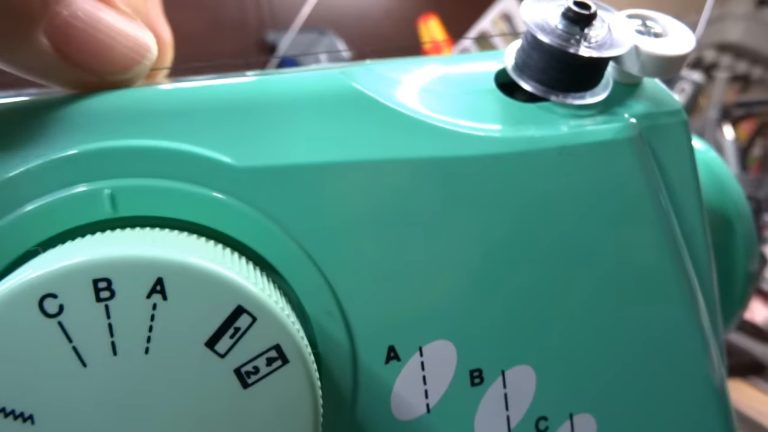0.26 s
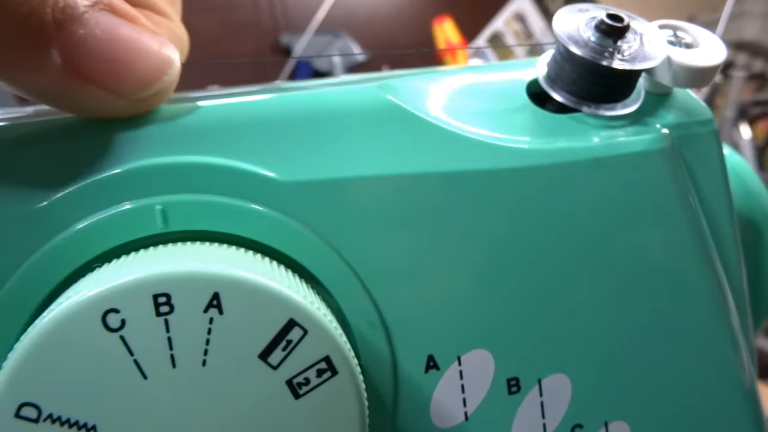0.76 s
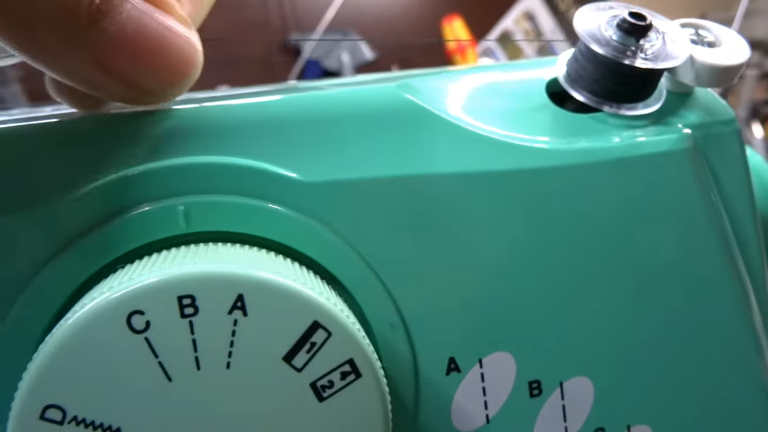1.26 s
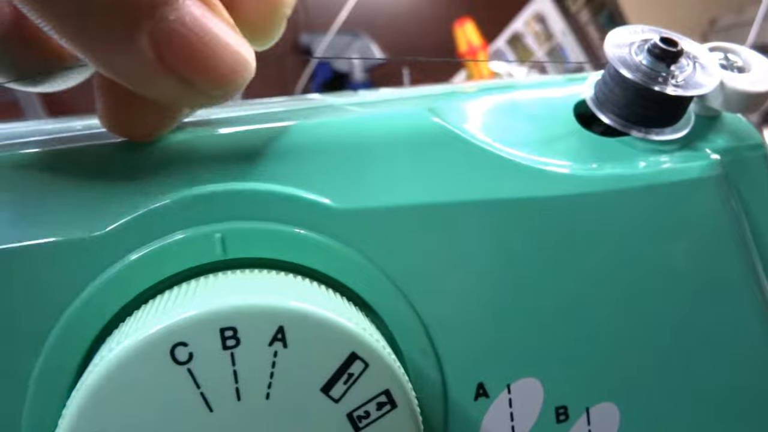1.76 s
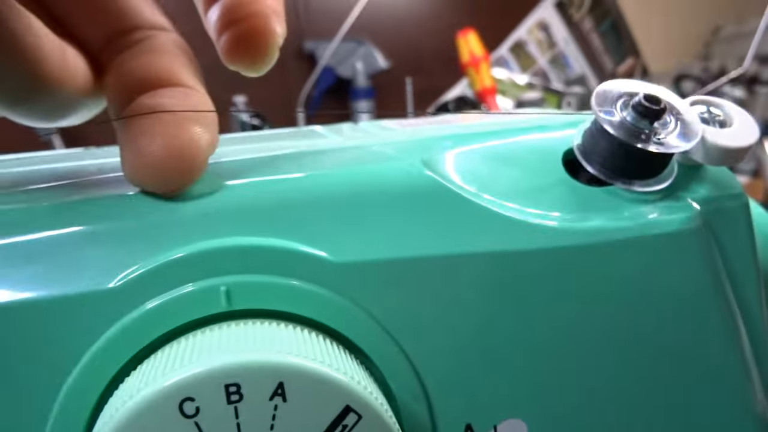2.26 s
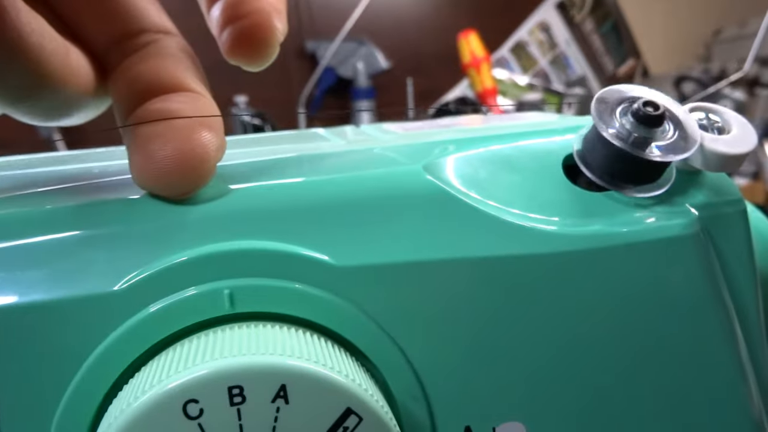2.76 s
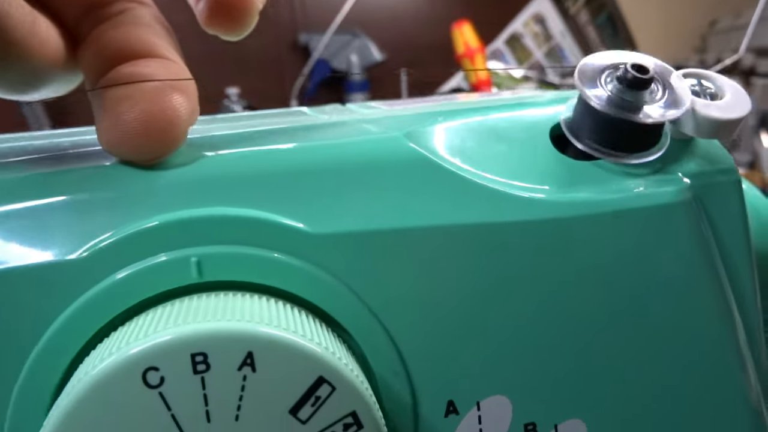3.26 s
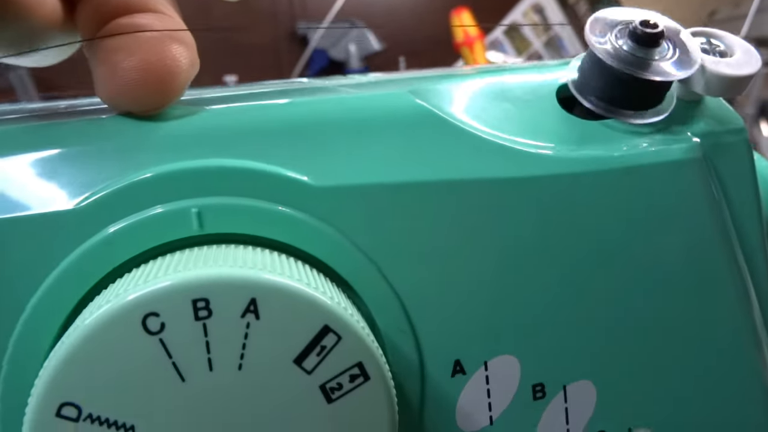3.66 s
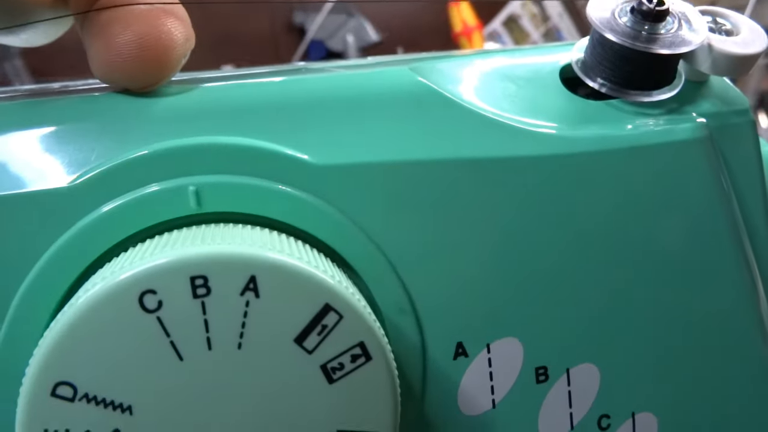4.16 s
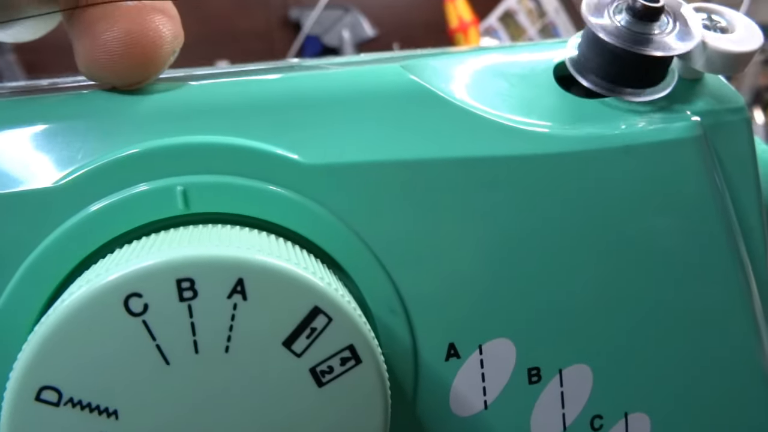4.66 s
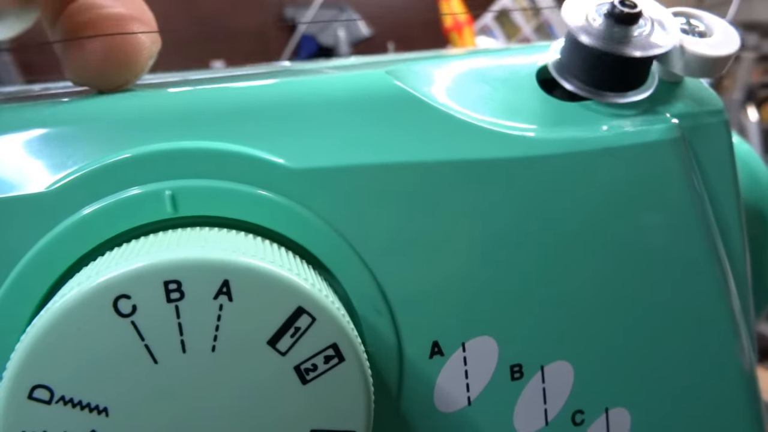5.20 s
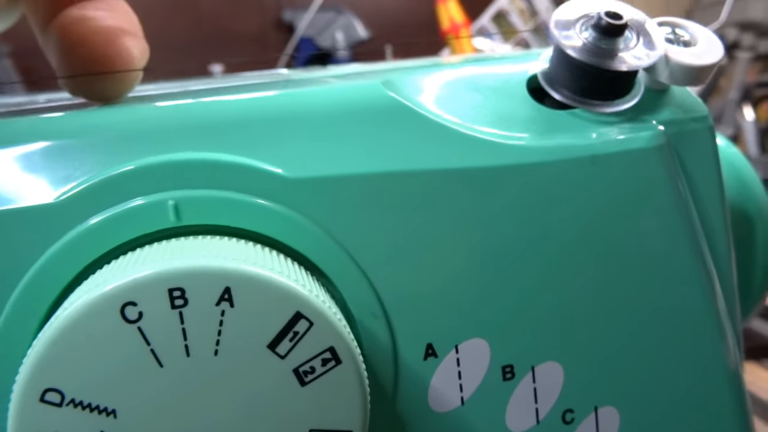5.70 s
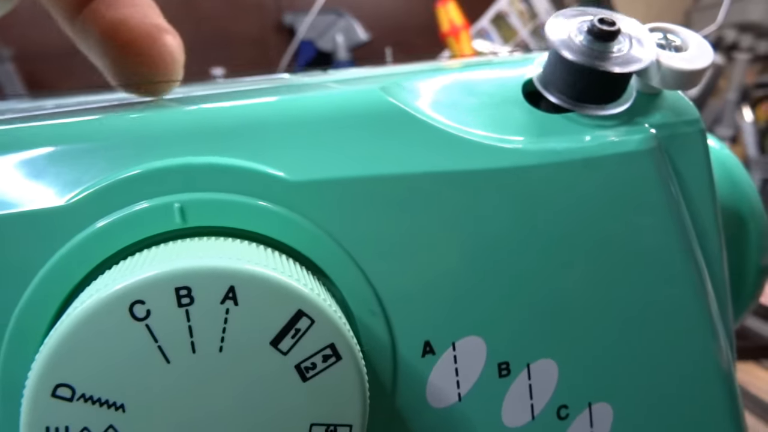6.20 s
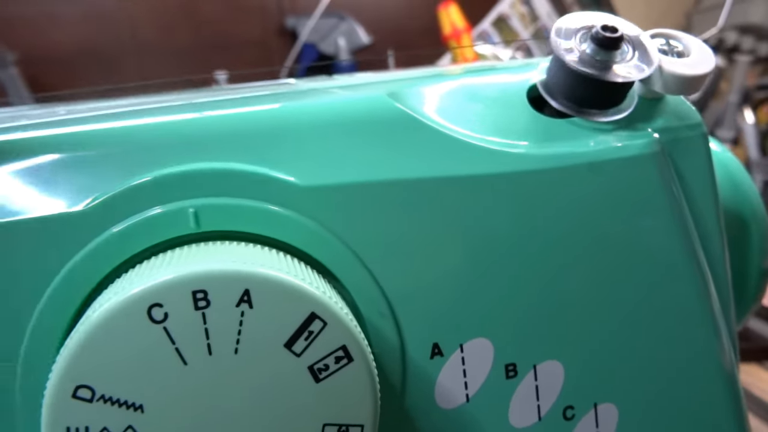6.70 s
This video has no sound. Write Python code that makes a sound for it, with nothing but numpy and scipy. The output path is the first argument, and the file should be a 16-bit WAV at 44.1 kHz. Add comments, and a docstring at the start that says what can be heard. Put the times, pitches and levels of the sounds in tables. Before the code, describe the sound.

After faint handling sounds, a small electric sewing machine motor revs briefly, coasts down, then whirs up again and keeps winding a rattling bobbin.

```python
"""Soft rubs and taps of fingers come first, in a quiet room; then a small sewing machine winds a bobbin.
It is driven twice: it whirs up, coasts down, whirs up again and runs to the end.
Gear grit, a knock per turn and the motor's commutator tone shake the hollow plastic housing, made of
resonators. Filtered noise makes the brush hiss; dying bursts of noise ring the loose metal bobbin.
Sines make the motor's other tones and its hum; a soft noise of air lies below everything."""
import sys
import numpy as np
from scipy import signal
from scipy.fft import rfft, irfft, next_fast_len
from scipy.io import wavfile

SR = 44100
rng = np.random.default_rng(int(sys.argv[2]) if len(sys.argv) > 2 else 0)


def dump_mix(stems):
    """Bounce the given channels to the path in sys.argv[1] as a 16-bit WAV at rate SR."""
    frames = np.atleast_2d(stems).T  # one column per channel
    limited = np.clip(frames, -1, 1)  # hard clip at full scale
    pcm = np.round(limited * 32767).astype(np.int16)
    wavfile.write(sys.argv[1], SR, pcm)


N = 306054

# Runs of the drive: (on t/s, off t/s, spin-up time/s)
PEDAL_RUNS = [(2.29, 3.475, .106), (4.32, 7.5, .051)]
REFERENCE_SPEED = 60  # turns/s
JERK_SPEED, JERK_S = 8.5, 0.03  # the rotor breaks loose with a jerk: turns/s won, time/s
QUICK_SPEED = 35.5  # turns/s won in the spin-up
SLOW_SPEED, SLOW_RISE_S = 16.5, 0.6  # turns/s won slowly, time/s
DRAG_S, FRICTION = 0.8, 42  # coasting: air and belt drag/s, dry friction/(turns/s lost per s)
SWITCH_ON_S, SWITCH_OFF_S = 0.015, 0.19  # the drive takes up and lets go of the load

# How layers follow the speed: (level/dB at reference speed, gain per doubling/dB, loss without current/dB)
LOW_LAW = (-29.5, 6.14, 1.8)
MIDDLE_LAW = (-23.5, 12.1, 3.4)
HIGH_LAW = (-23.5, 13.3, 2)
HISS_LAW = (-37.5, 12, 1.2)
HUM_LAW = (3.1, 7.6, 50)
# Brief level changes of the whir: (t/s, length/s, change of middle panels/dB, change of high panels/dB)
SWELLS = [(2.522, 0.018, 1.5, -5), (2.598, 0.018, -8, 1), (2.738, 0.095, 3.5, 2.5), (3.09, 0.077, 4.5, 0),
          (3.45, 0.019, 5, 2), (3.582, 0.079, 7, -1), (4.726, 0.18, -0.5, -1), (4.735, 0.064, 4.5, 5),
          (4.801, 0.02, 8.5, -1.5), (5.056, 0.025, 5, 4), (5.195, 0.017, 5, 1.3), (6.432, 0.014, 1, -2.5),
          (6.641, 0.024, 3, -1.5), (6.704, 0.03, 0.5, -3), (6.9, 0.011, 5.5, -2.5)]

# Resonances of the housing panels: (f/Hz, width/Hz, relative level/dB)
PANELS = [(229.2, 11, -14), (262, 15, -13), (360.8, 35.6, -6), (441.4, 54, -9.5), (505.8, 22.2, -3.5),
          (630, 58, 1), (674.4, 45.5, 3.5), (750.5, 63, -3), (870, 113, -13), (976, 67, -8.5),
          (1100, 72, -7.5), (1220, 28.6, -3.5), (1465, 200, -12), (1696, 76, -9), (1908, 118, -10.5),
          (2173, 210, -12.5), (2400, 300, -11.5), (2670, 150, -11), (3000, 253, -12)]
# Each running panel waxes and wanes by itself: (rate f/Hz, spread/dB)
PANEL_WANDER = [(4, 1.3), (25, 1.2)]
# Commutator tone near a panel resonance:
# (f/Hz, width setting/Hz, extra drive there/dB, drive everywhere/dB, rise of the extra without current/dB)
COMMUTATOR_TONE = (1030, 170, -11, -27, 4)
# Colour of the brush hiss: (f/Hz, relative level/dB)
BRUSH_COLOUR = [(1940, -29), (3300, -0.5), (3650, 1), (4430, -7), (5370, 1), (6380, -7.5), (6890, -9.5),
                (7660, -10), (9340, -10), (10200, -14.5), (10600, -1.5), (11100, -18), (14400, -50),
                (22000, -120)]
# Ringing brush holders: (f/Hz, time to fall 60 dB/s, relative level/dB)
BRUSH_RINGS = [(5270, 0.03, -38), (7180, 0.029, -34.5), (10110, 0.013, -27)]

# Ninth-order tone, strongest at a panel resonance: (f/Hz, half width below/Hz, above/Hz, level/dB)
NINTH_TONE = (506.5, 5.5, 16.5, -21)
# Mains hum and a stronger tone above it: (f/Hz, relative level/dB)
HUM_TONES = [(60, -56), (120, -52.5), (228, -49)]
# Shake of the unbalanced rotor: (cycles per turn, relative level/dB)
UNBALANCE = [(1, -61.5), (2, -48), (4, -45.5)]
# Colour of the low motor noise: (f/Hz, relative level/dB)
GROWL_COLOUR = [(15, -56), (25, -16), (75, -5), (113, 18), (135, 0), (174, 10), (220, -23), (290, -29),
                (480, -120)]
# Whine as current flows before the rotor moves: (start t/s, fade-out t/s, f/Hz, highest level/dB)
STALL_WHINE = (2.14, 2.29, 626, -62)

# Bobbin clacks: (t/s, relative level/dB, extra for rings above 7500 Hz/dB, relative flange level/dB)
CLACKS = [(2.72, -16, -14, -36), (2.7332, -7.5, -31, -38), (2.773, -18, -4, -39), (2.799, -20.5, 5.5, -18),
          (2.842, -15.5, -3, -19), (2.9599, -18.5, -12, -16.5), (3.083, -13.5, 1.5, -14.5),
          (3.465, -21, 2, -21), (3.569, -21, 11.5, -23), (3.743, -27.5, -14, -27), (3.893, -23, -11, -18),
          (4.0056, -52, -10.5, -40), (4.041, -45, -4.5, -37), (4.108, -53, 3, -45), (4.7232, -5.5, -29, -8),
          (4.739, -16, 3, -45), (4.7709, -8, -1.5, -9.5), (4.778, -24, -5, -12.5), (4.8009, -16.5, 6, -46),
          (4.8166, -23, 10, -40), (5.045, -19.5, -18, -19), (5.464, -35, -21, -17.5),
          (5.5969, -21, -3, -17), (5.711, -23, -20.5, -28.5), (5.7987, -17, -17.5, -15),
          (6.009, -16.5, 5, -18), (6.051, -20, -7, -29), (6.091, -20, 1.5, -22), (6.232, -19.5, -7, -42),
          (6.519, -17.5, 3.5, -23), (6.558, -19, 9, -19.5), (6.7364, -20, -11.5, -20.5),
          (6.7654, -20, 1.5, -29)]
# Rings of the bobbin metal: (f/Hz, relative level/dB, time to fall 60 dB/s)
BOBBIN_RINGS = [(2440, -14, 0.031), (4520, -20, 0.0051), (5200, 5, 0.0033), (6580, -3, 0.012),
                (7110, -0.5, 0.0057), (8340, -8.5, 0.0093), (9030, -2.5, 0.0057), (10440, -7.5, 0.021),
                (10900, -13, 0.013)]
# Ring of the bobbin's flange: (f/Hz, time to fall 60 dB/s)
FLANGE_RING = (2730, 0.03)

# Uneven knocks of the drive: (t/s, relative level/dB, shudder f/Hz, relative level of high panels/dB)
KNOCKS = [(2.381, -29, 665, -35), (2.426, -41, 668, -28), (2.483, -16, 640, -26), (2.514, -13, 680, -27),
          (2.569, -15, 690, -34), (2.636, -26, 670, -23), (2.718, -14, 620, -20), (2.751, -9.5, 635, -20),
          (2.819, -24, 692, -20), (2.975, -10.5, 662, -15), (3.075, -18, 657, -20), (3.216, -15, 647, -15),
          (3.594, -17, 640, -21), (3.69, -22, 684, -45), (3.716, -19.5, 630, -29), (3.736, -18.5, 660, -27),
          (3.758, -18.5, 716, -30), (3.787, -20, 636, -40), (3.821, -33, 681, -43),
          (3.846, -19.5, 646, -33), (3.896, -18, 640, -33), (3.943, -18.5, 644, -36),
          (3.999, -13, 716, -24.5), (4.081, -39, 737, -43), (4.895, -25, 659, -20), (5.068, -9, 650, -19),
          (5.449, -6.5, 600, -27), (5.562, -12, 745, -14), (5.615, -11.5, 700, -16), (5.658, -11, 660, -19),
          (5.76, -8.5, 745, -20), (5.869, -9.5, 645, -19), (5.896, -9, 640, -17), (6.1, -10.5, 656, -17.5),
          (6.146, -8.5, 670, -25), (6.251, -10, 640, -31), (6.399, -8.5, 595, -31), (6.435, -12, 680, -28),
          (6.498, -14, 625, -19), (6.533, -10.5, 760, -23), (6.584, -13, 600, -18), (6.618, -5, 660, -22),
          (6.7, -10, 640, -27)]
# Taps of fingers and pedal, relative levels:
# (t/s, low and middle panels level/dB, high panels level/dB, softness as cut-off f/Hz, tick level/dB)
TAPS = [(0.576, -52, -43.5, 1190, -55), (0.814, -36, -37, 1900, -41), (0.831, -41, -58, 1500, -62),
        (0.905, -53, -66, 1470, -66), (0.973, -56, -67, 1500, -66), (1.34, -55, -62, 1200, -68),
        (1.679, -59, -57, 1200, -71), (2.273, -54, -71, 1500, -68), (2.318, -40.5, -49, 1510, -53),
        (4.197, -50, -49.5, 1900, -56), (4.332, -37, -46, 1500, -48.5)]
# Rubs of a finger: (loudest t/s, spread/s, level/dB)
RUBS = [(0.0, 0.032, -56.5), (.35, 0.14, -72), (.51, 0.054, -66)]
RUSTLE_DB = -73.5  # steady part of the handling rustle

# Gain of the side signal: (f/Hz, level/dB)
SIDE_COLOUR = [(60, -22), (140, -21), (350, -23), (830, -18), (1990, -11.5), (4770, -8.5), (11400, -9)]
# Left minus right: (f/Hz, level/dB)
LEFT_LEAN = [(60, 0.2), (170, 0.4), (490, 0.6), (1400, 0.7), (4000, -0.3), (11400, -3)]
# Colour of the air noise: (f/Hz, relative level/dB)
AIR_COLOUR = [(20, -6), (45, -5.5), (95, -5.5), (250, -4.5), (450, -11), (900, -12), (1500, -17),
              (4000, -20.5), (11100, -24)]
# Side minus mid of the air noise: (f/Hz, level/dB)
AIR_WIDTH = [(60, -20), (170, -12), (490, -2.5), (1400, -1), (4000, -6.5), (11400, -10)]


def rotor():
    """Speed in turns/s and share of current 0-1: drive spins the rotor up, drag and friction slow it."""
    t = np.arange(N) / SR
    speed = np.full(N, 0.5)  # a floor above zero keeps the logarithm in follows() finite
    current = np.zeros(N)
    pull = FRICTION * DRAG_S
    for pressed, released, rise_s in PEDAL_RUNS:
        on = np.clip(t, pressed, released) - pressed
        off = np.maximum(t - released, 0)
        driven = QUICK_SPEED * (1 - (1 + on / rise_s) * np.exp(-on / rise_s))
        driven += SLOW_SPEED * (1 - np.exp(-on / SLOW_RISE_S))
        driven += JERK_SPEED * np.minimum(on / JERK_S, 1)
        speed = np.maximum(speed, (driven + pull) * np.exp(-off / DRAG_S) - pull)
        current += np.clip(on / SWITCH_ON_S, 0, 1) * np.clip(1 - off / SWITCH_OFF_S, 0, 1)
    return speed, current


def follows(law):
    """Level in dB of a layer that grows with speed and drops without current."""
    speed, current = rotor()
    full_db, doubling_db, off_db = law
    return full_db + doubling_db * np.log2(speed / REFERENCE_SPEED) - off_db * (1 - current)


def swells():
    """Brief level changes in dB, one row for the middle and one for the high panels."""
    t, extra = np.arange(N) / SR, np.zeros((2, N))
    for s, length, *up_db in SWELLS:
        shape = np.interp(t, [s - 0.008, s, s + length, s + length + 0.015], [0, 1, 1, 0])
        extra += np.outer(up_db, shape)
    return extra


def drive(phase, powered):
    """Grit and tooth chatter of the gears (two unlike draws), and a soft uneven knock each powered turn."""
    grit = rng.standard_normal((2, N)) * from_db(0.5 * drift(45) + 1.65 * drift(130))
    tooth_hits = rng.random((2, N)) < 500 / SR  # about 500 per second
    teeth = tooth_hits * rng.standard_normal((2, N)) * from_db(14)
    turns = (np.diff(np.floor(phase), prepend=0) > 0) & powered
    knocks = turns * from_db(22 + 1.5 * rng.standard_normal((2, N)))
    return grit + teeth + cut(knocks, 1150, "low")


def commutator(phase, speed, current):
    """The 24 bars sing roughly, loudest while their rate sweeps through a panel resonance."""
    centre_hz, width_hz, peak_db, base_db, coasting_db = COMMUTATOR_TONE
    near = crossing(24 * speed, centre_hz, width_hz) ** 2
    gain = from_db(peak_db + coasting_db * (1 - current)) * near + from_db(base_db)
    return gain * (1 + 0.9 * drift(90)) * np.sin(2 * np.pi * 24 * phase)


def housing(force, wanders=False):
    """Panel resonances side by side, signs alternating; returns low, middle and high panels apart."""
    groups = [0, 0, 0]
    for k, (hz, width, level_db) in enumerate(PANELS):
        r = np.exp(-np.pi * width / SR)
        a = [1, -2 * r * np.cos(2 * np.pi * hz / SR), r * r]
        # the tiny offset keeps the filter from slowing down on silence
        panel = (-1) ** k * from_db(level_db) * signal.lfilter([1 - r, 0, r - 1], a, force + 1e-18)
        if wanders:
            panel = panel * from_db(sum(db * drift(rate) for rate, db in PANEL_WANDER))
        group = np.searchsorted((570, 870), hz)  # group borders in Hz
        groups[group] = groups[group] + panel
    return groups


def brushes():
    """Flickering noise of the sliding brushes, which also rings their holders."""
    sparks = rng.standard_normal((2, N)) * from_db(0.62 * drift(4.2) + 0.77 * drift(160))
    hiss = rms_one(coloured(sparks, BRUSH_COLOUR))
    hiss += sum(from_db(db) * ring(sparks, hz, t60) for hz, t60, db in BRUSH_RINGS)
    return from_db(follows(HISS_LAW)) * hiss


def rattle():
    """Gears and commutator whir in the housing while the brushes hiss; two rows, mid and side."""
    speed, current = rotor()
    middle_up_db, high_up_db = swells()
    phase = np.cumsum(speed * (1 + 0.05 * drift(60))) / SR  # in turns
    force = drive(phase, current > 0.2) + commutator(phase, speed, current)
    low, middle, high = housing(force, wanders=True)
    whir = from_db(follows(LOW_LAW) + 0.22 * middle_up_db) * rms_one(low)
    whir += from_db(follows(MIDDLE_LAW) + middle_up_db) * rms_one(middle)
    whir += from_db(follows(HIGH_LAW) + high_up_db) * rms_one(cut(high, 2350, "low"))
    return whir + brushes()


def motor():
    """Ninth-order tone, hum with the current, shake and growl of the unbalanced rotor, and first whine."""
    speed, current = rotor()
    t = np.arange(N) / SR
    angle = 2 * np.pi * np.cumsum(speed * (1 + 0.002 * drift(10))) / SR

    centre_hz, below, above, ninth_db = NINTH_TONE
    ninth_hz = 9 * speed
    half_width = np.where(ninth_hz < centre_hz, below, above)
    ninth = crossing(ninth_hz, centre_hz, half_width) * current * np.sin(9 * angle)
    ninth = ninth * from_db(ninth_db + 0.5 * drift(11))

    hum_db = follows(HUM_LAW)
    hum = sum(from_db(db + hum_db + 1.8 * drift(3)) * np.sin(2 * np.pi * hz * t) for hz, db in HUM_TONES)

    load = (speed / REFERENCE_SPEED) ** 2 * (0.18 + 0.3 * current)  # unbalance grows with speed squared
    shake = sum(from_db(db + 4 * drift(3)) * np.sin(order * angle) for order, db in UNBALANCE)
    growl = from_db(-43.5) * rms_one(coloured(rng.standard_normal(N), GROWL_COLOUR))

    start, end, whine_hz, whine_db = STALL_WHINE
    envelope = np.interp(t, [start, start + 0.03, end, end + 0.02], [0, 1, 0.5, 0])
    whine = from_db(whine_db) * np.sin(2 * np.pi * whine_hz * t) * envelope
    return ninth + hum + load * (shake + growl) + whine


def bobbin():
    """Each clack of the loose bobbin on its spindle is a dying chatter that hisses and rings the metal."""
    out = np.zeros(N)
    t = np.arange(SR // 10) / SR
    for s, db, top_db, flange_db in CLACKS:
        chatter = rng.standard_normal(len(t)) * np.exp(-t / 0.014) * np.minimum(t / 0.0018, 1)
        clack = from_db(db - 11) * cut(chatter, 3500, "high")
        # one click and a little chatter strike the flange
        clack += from_db(flange_db - 4.5) * ring(0.07 * chatter + (t == 0), *FLANGE_RING)
        for hz, mode_db, t60 in BOBBIN_RINGS:
            tilt_db = top_db * (hz > 7500)
            ring_db = db + mode_db - 28.5 + tilt_db + rng.normal(0, 3.5)
            clack += from_db(ring_db) * ring(chatter, hz, t60)
        at = round(s * SR)
        out[at:at + len(t)] += clack[:N - at]
    return out


def drive_knocks():
    """Each knock is a brief shudder in the low and middle panels and a rap on the high ones."""
    t, out = np.arange(SR // 4) / SR, np.zeros(N + SR)
    for s, db, hz, high_db in KNOCKS:
        push = np.sin(2 * np.pi * hz * t) * t / 0.0015 * np.exp(-t / 0.0014)
        rap = rng.standard_normal(len(t)) * np.exp(-t / 0.02)
        knock = from_db(db + 12) * sum(housing(push)[:2])
        knock += from_db(high_db + 19) * cut(housing(rap)[2], 1760, "low")
        at = round((s - 0.006) * SR)  # starts just ahead of the listed time
        out[at:at + len(t)] += knock
    return out[:N]


def taps():
    """Each tap is a touch and a short scrape, heard through the panels and as a direct tick."""
    t, out = np.arange(SR // 4) / SR, np.zeros(N + SR)
    for s, low_db, high_db, soft_hz, tick_db in TAPS:
        scrape = rng.standard_normal(len(t)) * np.exp(-t / 0.009)
        contact = scrape / np.linalg.norm(scrape) + 1.6 * (t == 0)
        low, middle, high = housing(contact)
        tap = from_db(low_db + 40.5) * (0.78 * cut(low, 330, "high") + middle)
        tap += from_db(high_db + 45.5) * cut(high, soft_hz, "low")
        tap += from_db(tick_db + 27.5) * cut(cut(contact, 1800, "high"), 3750, "low")
        at = round(s * SR)
        out[at:at + len(t)] += tap
    return out[:N]


def rustle():
    """Fingers resting on the housing stir its panels faintly, until the drive first comes on."""
    low, middle, high = housing(rng.standard_normal(N) * from_db(2.4 * drift(13)))
    t = np.arange(N) / SR
    level = from_db(RUSTLE_DB)
    level = level + sum(from_db(db) * np.exp(-((t - s) / spread) ** 2) for s, spread, db in RUBS)
    stirred = rms_one(0.62 * low + middle + 2 * cut(high, 1400, "low"))
    return level * (t < PEDAL_RUNS[0][0]) * stirred


def room(x):
    """Dense echoes that fall 60 dB in 0.34 s, drawn apart for mid and side."""
    t = np.arange(SR // 2) / SR
    tail = rng.standard_normal((2, len(t))) * from_db(-60 * t / 0.34) * (t > 0.004)
    tail = cut(tail, 5400, "low")
    tail /= np.sqrt(np.sum(tail ** 2, axis=1, keepdims=True))
    return from_db(-14) * signal.fftconvolve(x[None], tail, axes=1)[:, :N]


def air():
    """Steady coloured noise for left and right, made from a mid and a side draw."""
    mid, side = from_db(-61.5) * rms_one(coloured(rng.standard_normal((2, N)), AIR_COLOUR))
    return mid + coloured(side, AIR_WIDTH) * [[1], [-1]]


def from_db(db):
    """Gain of a level in dB."""
    return 10 ** (np.asarray(db) / 20)


def rms_one(x):
    """Scales a signal to an rms of 1."""
    return x / np.sqrt(np.mean(x ** 2) + 1e-20)


def coloured(x, points, power=1):
    """Shapes a signal by a spectrum of (f/Hz, level/dB), its dB times power."""
    size = next_fast_len(N + 4096)
    hz = np.maximum(np.fft.rfftfreq(size, 1 / SR), 1)
    point_hz, point_db = np.array(points).T
    gain = from_db(power * np.interp(np.log(hz), np.log(point_hz), point_db))
    return irfft(rfft(x, size) * gain, size)[..., :N]


def drift(rate):
    """Random wandering of spread 1: noise smoothed by two equal low-passes at the rate in Hz."""
    r = np.exp(-40 * np.pi * rate / SR)  # worked out at every 20th sample
    noise = rng.standard_normal(N // 20 + 4002)
    slow = signal.lfilter([1], [1, -2 * r, r * r], noise)[4000:]  # skip the filter's start
    return np.interp(np.arange(N) / 20, np.arange(len(slow)), rms_one(slow))


def cut(x, hz, kind):
    """Second-order low- or high-pass."""
    return signal.sosfilt(signal.butter(2, hz, kind, fs=SR, output="sos"), x)


def ring(force, hz, t60):
    """A unit click sets a sine of height 1 ringing, which falls 60 dB in t60 seconds."""
    r, w = from_db(-60 / (t60 * SR)), 2 * np.pi * hz / SR
    return signal.lfilter([0, np.sin(w)], [1, -2 * r * np.cos(w), r * r], force)


def crossing(hz, centre_hz, half_width):
    """Gain of a tone near a resonance: 1 at the centre, half at the half width."""
    return 1 / (1 + ((hz - centre_hz) / half_width) ** 2)


def scene():
    """The large housing reaches the two ports by unlike paths, the more so in the treble."""
    running, other_panels = rattle()
    hits = motor() + bobbin() + drive_knocks() + taps() + rustle()
    echoes = room(running + hits)
    t = np.arange(SR // 50) / SR
    paths = rng.standard_normal(len(t)) * np.exp(-t / 0.003)
    scattered = signal.fftconvolve(hits, paths / np.linalg.norm(paths))[:N]
    mid = running + hits + echoes[0]
    side = coloured(other_panels + scattered + echoes[1], SIDE_COLOUR)
    left = coloured(mid, LEFT_LEAN, power=0.5) + side
    right = coloured(mid, LEFT_LEAN, power=-0.5) - side
    return np.array([left, right]) + air()


def record(dry):
    """The microphone misses the deepest bass; a steep filter cuts the top above 11150 Hz."""
    top_cut = signal.ellip(12, 0.5, 80, 11150, fs=SR, output="sos")
    return signal.sosfilt(top_cut, cut(dry, 38, "high"))


dry = scene()
out = record(dry)
dump_mix(out)
```